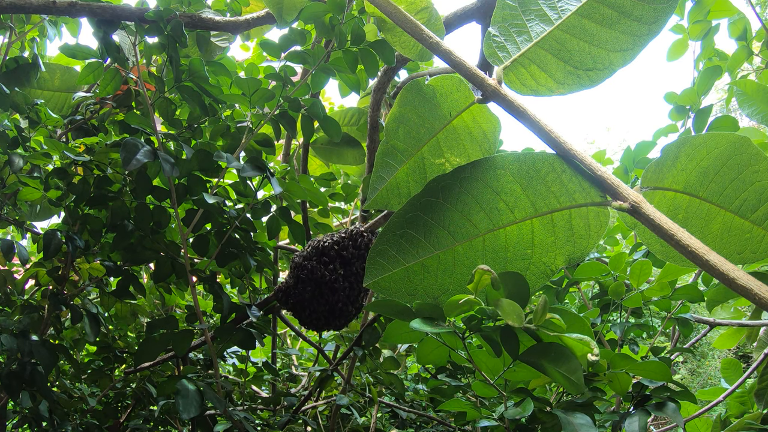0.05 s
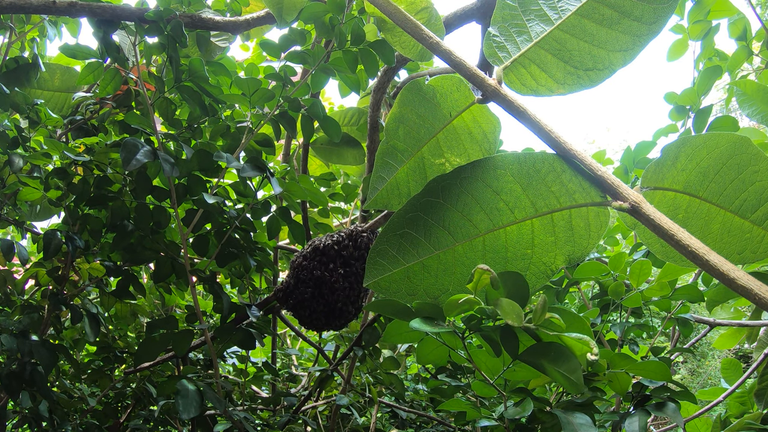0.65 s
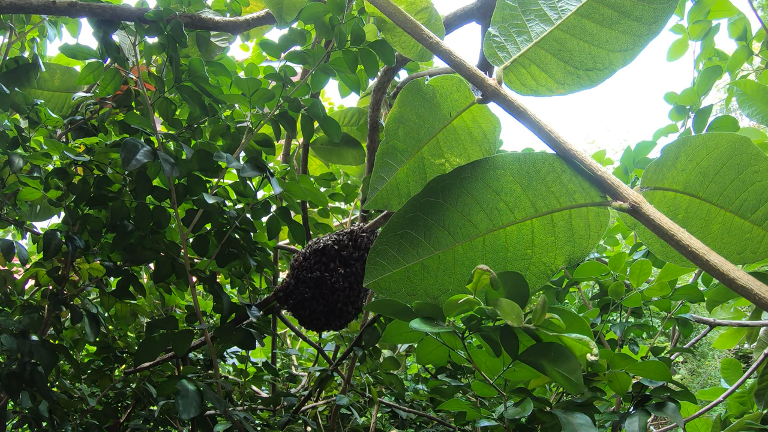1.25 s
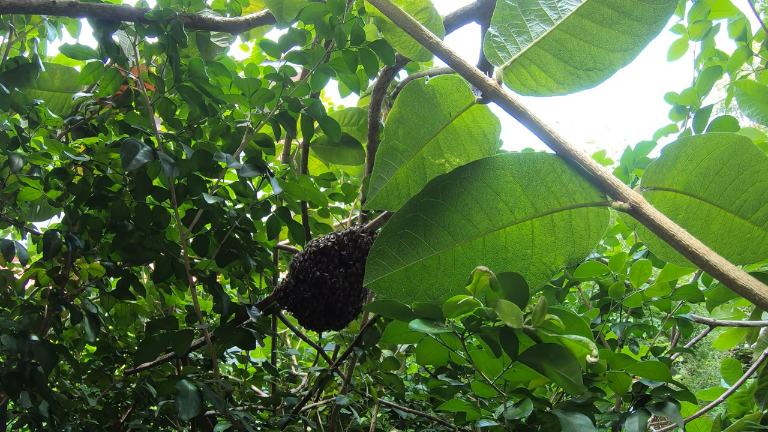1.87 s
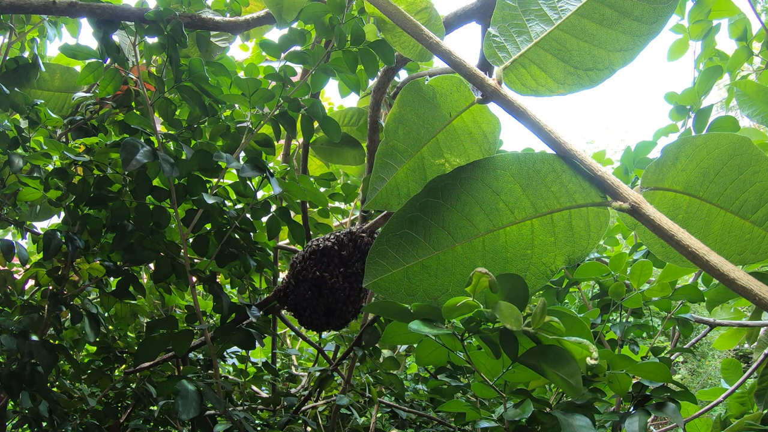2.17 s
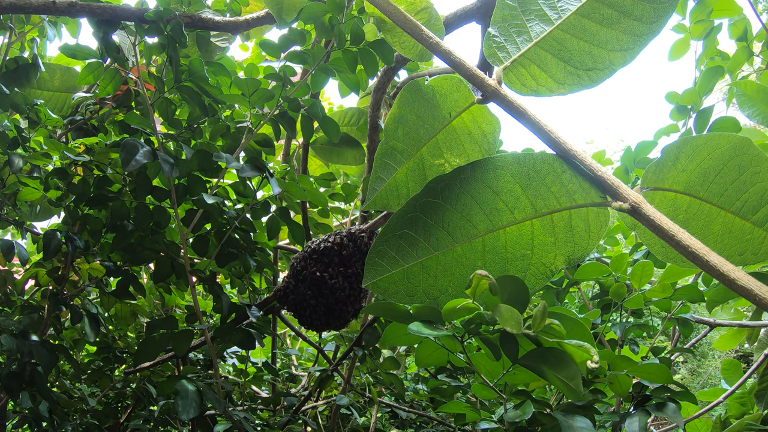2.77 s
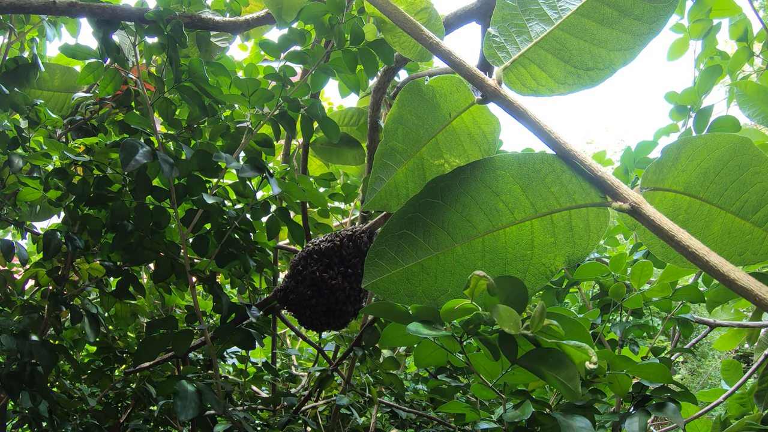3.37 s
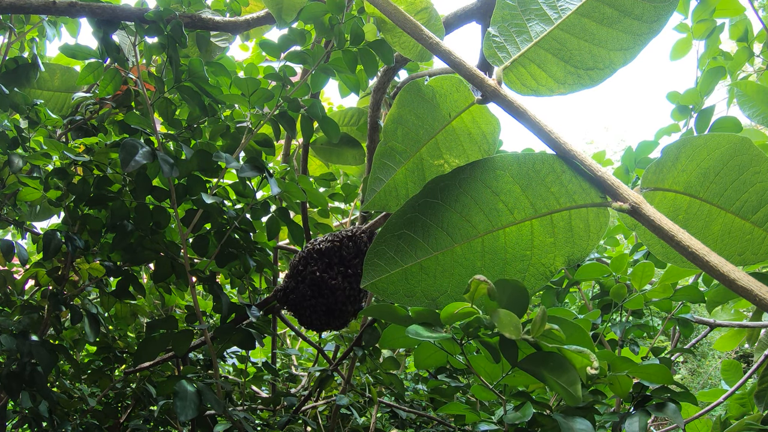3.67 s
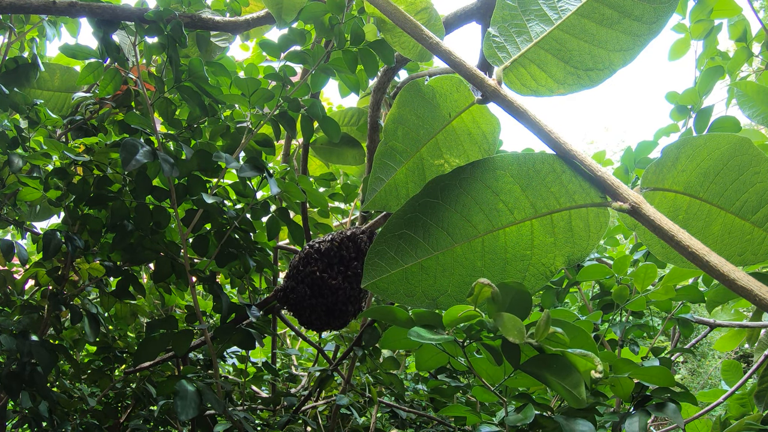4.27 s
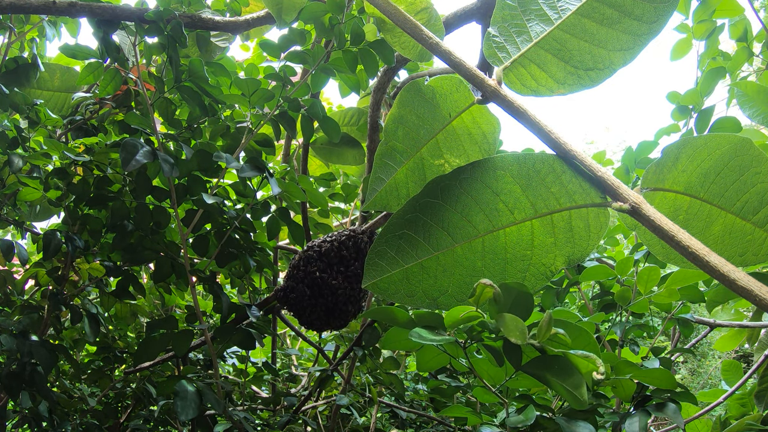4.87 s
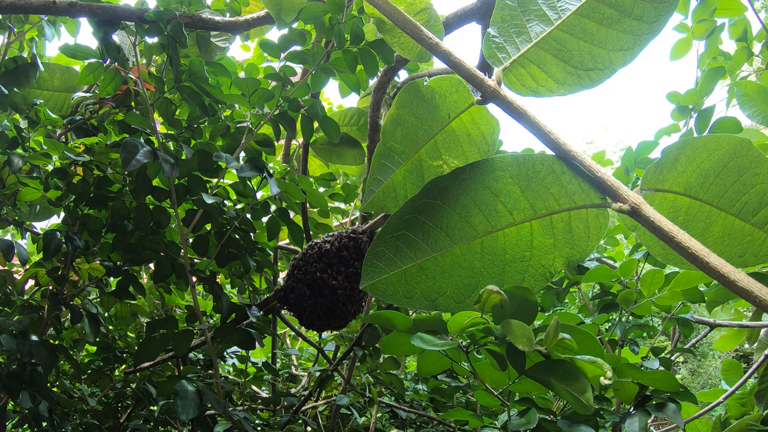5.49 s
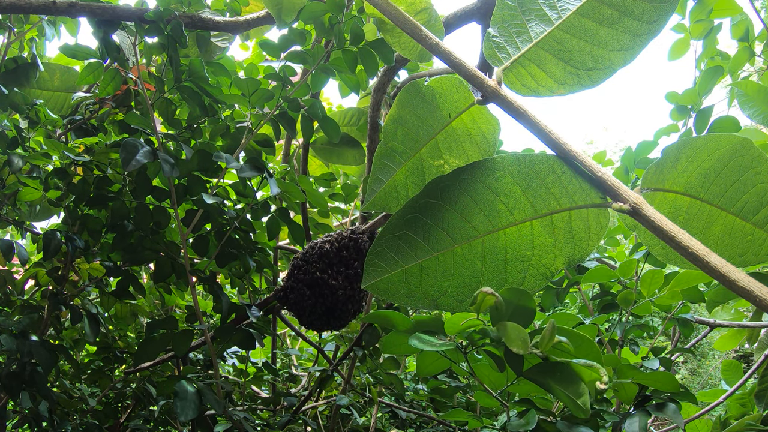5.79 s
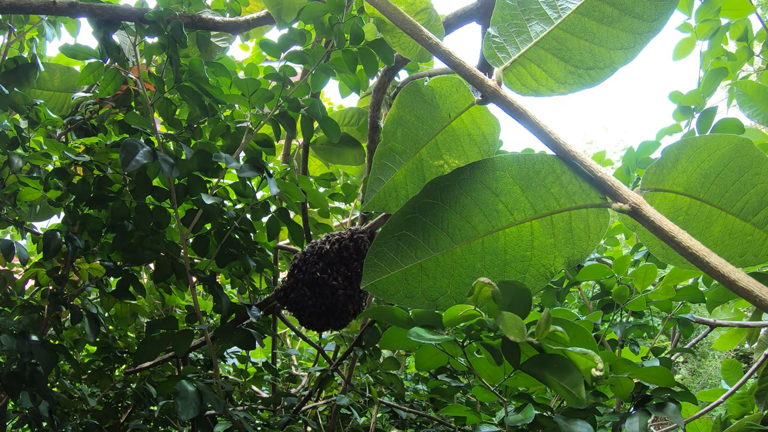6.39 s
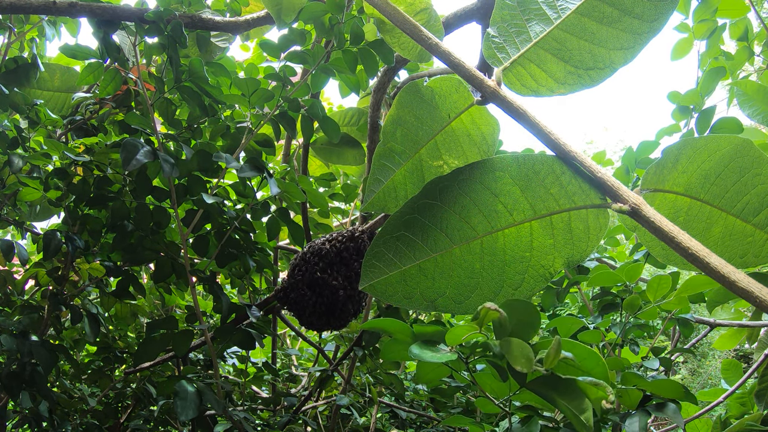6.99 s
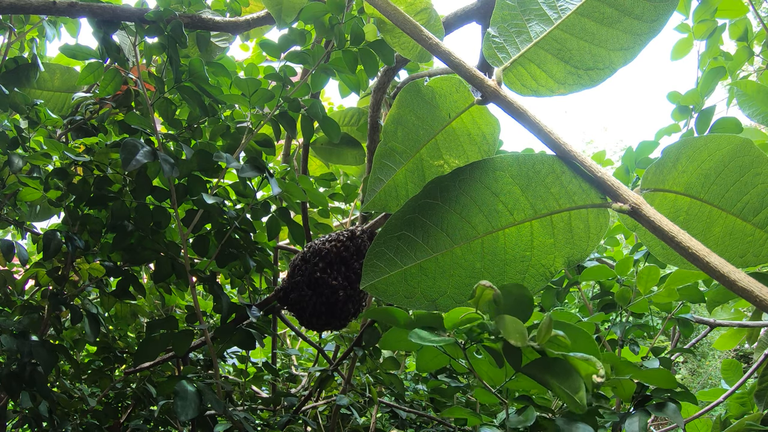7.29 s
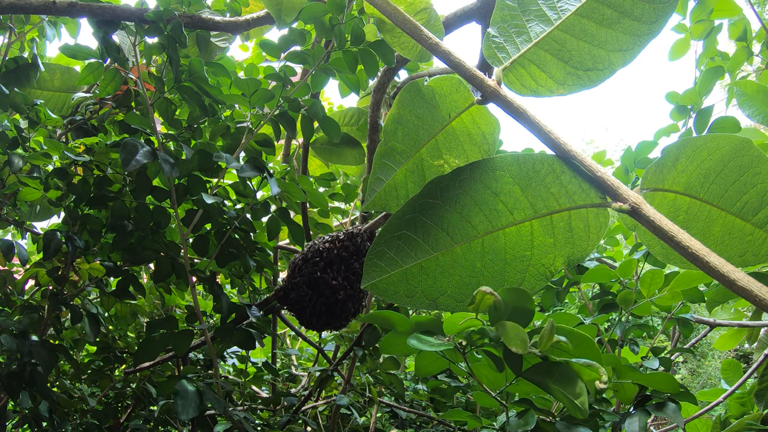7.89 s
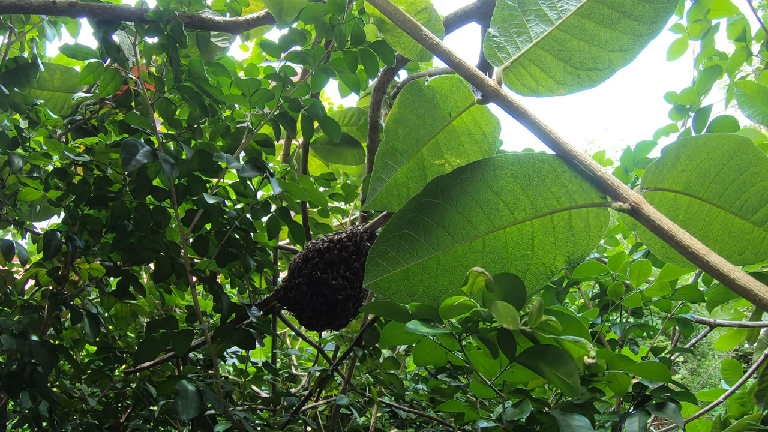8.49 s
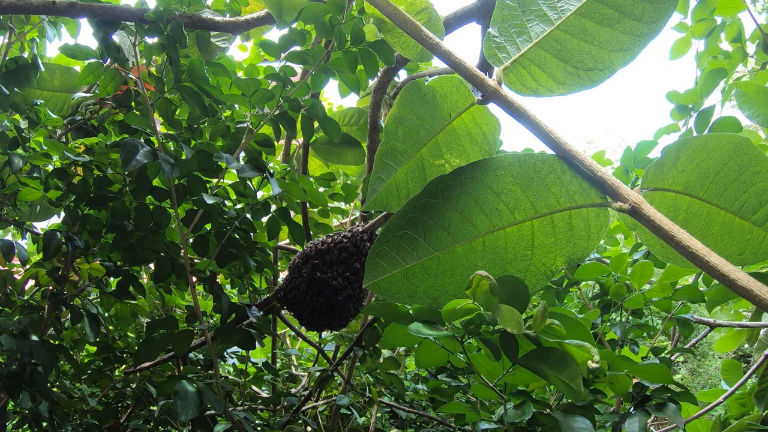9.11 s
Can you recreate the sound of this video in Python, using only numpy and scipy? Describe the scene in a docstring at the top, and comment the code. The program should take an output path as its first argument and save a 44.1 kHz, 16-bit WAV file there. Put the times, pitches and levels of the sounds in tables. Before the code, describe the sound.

Bursts of hissing swell and fade from a cluster of bees in foliage, above a soft hum and faint bird calls.

```python
"""Waves of hissing come from a bee colony hanging in dense foliage: bee after bee briefly whirs
its wings, and the alarm runs over the comb. Under it lie a low, uneven hum of wings and the
rumble of the air. Leaves rustle now and then, one bird chatters in short, raspy bursts, and
a far one gives a run of soft hoots."""
import sys
import numpy as np
from scipy import signal
from scipy.fft import rfft, irfft
from scipy.io import wavfile
from scipy.ndimage import uniform_filter1d

SR = 44100
rng = np.random.default_rng(int(sys.argv[2]) if len(sys.argv) > 2 else 0)


def transcribe(signal):
    """Save signal, clipped to [-1, 1], as a 16-bit WAV file at the path in sys.argv[1]."""
    frames = np.atleast_2d(signal).T
    limited = np.clip(frames, -1, 1)
    pcm = np.round(limited * 32767).astype(np.int16)
    wavfile.write(sys.argv[1], SR, pcm)


N = 407925
TIME = np.arange(N) / SR
FREQS = np.fft.rfftfreq(N, 1 / SR)


def gain_of(db):
    """Turns decibels into a number to multiply a sound by."""
    return 10 ** (np.asarray(db) / 20)


def evened(x):
    """Scales a signal to a typical size (rms) of 1."""
    return x / np.sqrt(np.mean(x ** 2) + 1e-20)


def curve(points):
    """Joins (Hz, value) points into a curve over all frequencies, on a log scale."""
    hz, value = np.transpose(points)
    return np.interp(np.log(FREQS + 1), np.log(hz + 1), value)


def drift(rate_hz):
    """A smooth random wobble; a higher rate makes it quicker."""
    return evened(irfft(rfft(rng.standard_normal(N)) * np.exp(-(FREQS / rate_hz) ** 2), N))


def patchy_noise(depth_db, size):
    """Two noises whose level wanders in patches; size is (frequency steps, time steps)."""
    frames = dict(nperseg=1024, noverlap=768)
    spectra = signal.stft(rng.standard_normal((2, N)), **frames)[2]
    patches = uniform_filter1d(rng.standard_normal(spectra.shape[1:]), size[0], axis=0)
    patches = evened(uniform_filter1d(patches, size[1], axis=1))
    return signal.istft(spectra * gain_of(depth_db * patches), **frames)[1][:, :N]


def swells(rows, steady_db):
    """Level in dB of a steady sound plus bell-shaped swells."""
    bells = sum(gain_of(db) ** 2 * np.exp(-((TIME - peak) / half) ** 2) for peak, half, db in rows)
    return 10 * np.log10(gain_of(steady_db) ** 2 + bells)


# Left-right balance. Each row: frequency in Hz, how much louder the left is in dB.
BALANCE = [(60, 0.0), (750, -1.5), (1200, 1.5), (4200, 0), (7000, -5), (9200, -3), (10700, 6), (12500, 5),
           (15700, 4)]
# How alike the two sides sound. Each row: frequency in Hz, likeness (1 the same, 0 unrelated).
LIKENESS = [(40, .88), (150, .97), (350, .84), (600, .35), (1100, .12), (2300, .42), (4100, .6),
            (5200, .03), (7200, -.1), (10000, 0)]
def stereo(noises, colour):
    """Gives two unrelated noises a tone colour and blends them into left and right."""
    left, other = rfft(noises)
    likeness, side_db = curve(LIKENESS), curve(BALANCE)
    right = likeness * left + np.sqrt(1 - likeness ** 2) * other
    sides = np.array([left * gain_of(side_db / 2), right * gain_of(-side_db / 2)])
    return evened(irfft(sides * gain_of(curve(colour)), N))


# Waves of alarm. Each row: start in seconds, crest in seconds, level in dB,
# half length in seconds, how fast the stragglers fade in dB per second.
ALARM_WAVES = [(-0.1, 0.063, -27, 0.23, 53), (0.099, 0.283, -28.5, 0.083, 116),
               (0.645, 0.739, -31, 0.032, 90), (0.554, 0.635, -45, 0.055, 57),
               (0.53, 0.833, -33.5, 0.079, 37), (1.523, 1.661, -33.5, 0.071, 22),
               (1.574, 1.815, -34.5, 0.16, 27), (2.035, 2.085, -41, 0.024, 90),
               (2.546, 2.717, -31, 0.084, 30), (2.971, 3.058, -54, 0.02, 76),
               (3.265, 3.333, -37.5, 0.037, 71), (3.177, 3.42, -39, 0.16, 29),
               (3.962, 4.052, -43, 0.038, 45), (4.456, 4.721, -26, 0.08, 81),
               (5.27, 5.499, -27.5, 0.077, 90), (5.842, 5.948, -35.5, 0.054, 90),
               (5.967, 6.058, -30, 0.084, 87), (6.453, 6.537, -41, 0.033, 90),
               (6.52, 6.698, -30, 0.069, 97), (6.998, 7.082, -38.5, 0.038, 88),
               (7.025, 7.242, -31, 0.085, 94), (7.546, 7.643, -43.5, 0.042, 49),
               (7.704, 7.86, -34.5, 0.096, 78), (8.088, 8.208, -54.5, 0.096, 58.5),
               (8.24, 8.454, -32.5, 0.068, 83), (8.759, 9.054, -32.5, 0.079, 51)]
def alarm(restless_db=-61, onset_s=0.047, stray_db=-5, gather_db_per_s=73):
    """Level in dB of the comb: a wave starts abruptly, most bees whir at its crest, a few trail off."""
    power = np.full(N, gain_of(restless_db) ** 2)
    for start, crest, db, half, fade in ALARM_WAVES:
        t = TIME - crest
        onset = np.clip((TIME - start) / onset_s, 0, 1)
        crowd = np.exp(-(t / half) ** 2)
        strays = gain_of(stray_db + np.minimum(gather_db_per_s * t, -fade * t)) ** 2
        power += (gain_of(db) * onset) ** 2 * (crowd + strays)
    return 10 * np.log10(power)


def wingbeats(beat_hz, spread, puff_beats, bees):
    """Each bee puffs air once per wingbeat, at its own wandering rate; together they sound grainy."""
    moments, power = np.linspace(0, TIME[-1], 60), np.zeros(N)
    for rates in beat_hz * np.exp(spread * rng.standard_normal((bees, len(moments)))):
        beats = np.cumsum(np.interp(TIME, moments, rates)) / SR
        power += np.exp(-(beats % 1) / puff_beats)
    return evened(np.sqrt(power))


# Tone colour of the hiss. Each row: frequency in Hz, relative level in dB.
HISS_COLOUR = [(250, -31), (700, -17.0), (1000, -12.5), (1300, -10.5), (2100, -4.0), (3100, -3.5),
               (4200, -4.5), (5200, -2), (6100, -3.0), (7500, -0.5), (9500, -4.5), (11400, -12),
               (12500, -13.5), (15700, -25)]
def colony_hiss(level_db=-0.92, body_hz=3000, fizz_hz=10000):
    """Wing puffs swell and fade as a wave crosses the comb, brightest and smoothest at the crest."""
    wave_db = alarm()
    below_crest_db = wave_db.max() - wave_db
    puffs = patchy_noise(depth_db=1.04, size=(10, 8))
    puffs *= wingbeats(beat_hz=212, spread=0.14, puff_beats=0.71, bees=14)
    hiss = stereo(puffs, HISS_COLOUR)
    low, no_fizz = (irfft(rfft(hiss) / (1 + (FREQS / hz) ** 8), N) for hz in (body_hz, fizz_hz))
    # as a wave dies, its highest fizz goes first and its body last
    fizz = (hiss - no_fizz) * gain_of(0.12 * (7.5 - below_crest_db))
    middle = no_fizz - low
    body = low * gain_of(-1.02 + 0.16 * below_crest_db)
    flutter_db = (0.58 + 0.012 * below_crest_db) * drift(rate_hz=21)
    lean_db = np.array([[-0.12], [0.12]])  # the comb is a little louder on the right
    return (body + middle + fizz) * gain_of(wave_db + level_db + flutter_db + lean_db)


def wing_tones(beat_hz, spread, waver, fade_db, bees):
    """A few tones, as of flying bees: each has its own pitch, and wavers and fades."""
    out = np.zeros(N)
    for offset in np.linspace(-1, 1, bees):
        hz = beat_hz * np.exp(spread * offset + waver * drift(rate_hz=9.09))
        out += np.sin(2 * np.pi * np.cumsum(hz) / SR) * gain_of(fade_db * drift(rate_hz=2.5))
    return evened(out)


# Tone colours of the calm hum, the swollen hum and the hum's upper part.
# Each row: frequency in Hz, relative level in dB.
CALM_COLOUR = [(60, -30), (110, -12.5), (165, -1.5), (210, -4), (255, -6), (310, -10), (500, -83)]
SWOLLEN_COLOUR = [(50, -34), (85, -9), (125, -0.5), (190, 0), (250, -9), (340, -19.5), (600, -48)]
UPPER_COLOUR = [(220, -32), (300, -2), (375, 0.5), (450, -4.5), (560, -10), (900, -13), (2000, -43)]
# Bees flying near. Each row: nearest moment in seconds, half length in seconds,
# level of the low hum in dB, level of its upper part in dB.
FLY_BYS = [(0.66, 0.062, -47, -70), (0.917, 0.2, -49, -53.5), (1.384, 0.16, -47.5, -69),
           (1.61, 0.15, -54, -53), (1.863, 0.19, -45.5, -54), (2.556, 0.19, -54, -59),
           (3.07, 0.22, -50.5, -53), (3.495, 0.12, -45.5, -53), (3.736, 0.13, -38.5, -57),
           (4.1, 0.22, -44.5, -54.5), (4.878, 0.4, -51.5, -58.5), (5.358, 0.076, -52.5, -63),
           (7.2, 0.36, -52, -68), (8.95, 0.062, -59, -56)]
def hum(steady_low_db=-52.5, steady_upper_db=-63, settle_db_per_s=-0.42, blur_db=-2):
    """Low and higher wing tones blur into a hum that slowly settles and deepens as bees fly near."""
    settle_db = settle_db_per_s * TIME
    low_db = swells([(peak, half, db) for peak, half, db, _ in FLY_BYS], steady_low_db + settle_db)
    upper_db = swells([(peak, half, db) for peak, half, _, db in FLY_BYS], steady_upper_db + settle_db)
    calm, swollen, upper = (stereo(patchy_noise(depth_db=1, size=(1, 30)), colour)
                            for colour in (CALM_COLOUR, SWOLLEN_COLOUR, UPPER_COLOUR))
    low_tones = wing_tones(beat_hz=210.7, spread=0.08, waver=0.05, fade_db=7, bees=3)
    upper_tones = wing_tones(beat_hz=372, spread=0.04, waver=0.04, fade_db=6, bees=3)
    calm = gain_of(blur_db) * calm + gain_of(-5) * low_tones
    upper = gain_of(blur_db) * upper + gain_of(-7) * upper_tones
    swell = np.clip((low_db + 50) / 7, 0, 1)  # calm up to -50 dB, fully swollen 7 dB higher
    low = np.sqrt(1 - swell) * calm + np.sqrt(swell) * swollen
    return gain_of(low_db) * low + gain_of(upper_db + 0.5) * upper


# Tone colours of the air's rumble and its far wash. Each row: frequency in Hz, relative level in dB.
GUST_COLOUR = [(15, -24), (30, -19), (48, -6.5), (64, -0.5), (82, -7), (130, -11.5), (300, -83)]
WASH_COLOUR = [(100, 7.5), (450, -0.5), (700, -2.5), (1500, -2), (3000, -12), (8000, -12), (15000, -57)]
# Gusts of air. Each row: peak in seconds, half length in seconds, level in dB.
AIR_GUSTS = [(.45, 0.1, -60.5), (1.3, 0.24, -59), (3.1, .22, -56), (3.76, 0.21, -49.5), (4.25, 0.1, -51.5),
             (4.7, .14, -53.5), (5.8, 0.42, -53.5), (6.52, 0.19, -52.5), (7.45, 0.26, -56),
             (8.68, 0.13, -52.5)]
def air(calm_db=-65.5, lumps_db=2, wash_db=-57):
    """Moving air makes deep, lumpy gusts and a thin, steady wash from far away."""
    rumble = stereo(rng.standard_normal((2, N)), GUST_COLOUR)
    rumble *= gain_of(swells(AIR_GUSTS, calm_db) + lumps_db * drift(rate_hz=8))
    wash = stereo(patchy_noise(depth_db=3, size=(8, 12)), WASH_COLOUR)
    return rumble + gain_of(wash_db) * wash


# Tones that swell out of the hum.
# Each row: peak in seconds, half length in seconds, pitch in Hz, level in dB.
DRONE_NOTES = [(3.118, 0.19, 378, -49.5), (3.59, 0.099, 554, -59), (5.313, 0.083, 222.7, -54),
               (6.104, 0.59, 63.8, -55.5), (7.3, 0.48, 215, -54), (1.41, 0.34, 207.8, -48.5),
               (1.598, .12, 383.6, -56), (4.91, 0.083, 211.7, -52)]
def drones():
    """Pairs of close, wavering tones come forward and sink back."""
    out = np.zeros(N)
    for peak, half, hz, db in DRONE_NOTES:
        bell = np.exp(-((TIME - peak) / half) ** 2)
        out += gain_of(db) * bell * wing_tones(hz, spread=0.035, waver=0.03533, fade_db=-2, bees=2)
    return out


# Short, grainy noises: leaf rustles, ticks and the rasp of the bird's chirps. Each row: peak in
# seconds, level in dB, centre pitch in Hz, width in octaves, rise in seconds, decay in seconds.
GRAINY_NOISES = [(1.176, -46, 2090, 0.84, 0.0043, 0.035), (1.222, -47.5, 3200, 0.75, 0.0087, 0.02),
                 (1.38, -54, 3000, .55, .006, .028), (2.21, -51, 1800, .35, .003, .014),
                 (2.304, -48, 2100, .7, .002, .007), (2.532, -49, 3200, 1.0, .002, 0.0094),
                 (2.91, -45, 1900, .5, .003, .04), (2.962, -45, 3300, 0.6, 0.008, 0.012),
                 (3.05, -45.5, 2600, 0.84, 0.02, .015), (5.06, -54, 2600, 0.76, .03, 0.027),
                 (5.118, -51.5, 1850, 0.35, 0.011, 0.033), (5.808, -54, 2400, .35, .012, .025),
                 (7.985, -43.5, 1380, 1, 0.023, 0.039), (8.438, -42.5, 950, 1.0, 0.033, 0.041),
                 (8.468, -46, 470, 0.6, 0.04, 0.018), (8.812, -51, 1400, 1.0, 0.011, 0.03),
                 (8.865, -51, 1800, 0.73, .015, .03), (8.98, -50, 800, 1.0, 0.072, .05)]
def rustles_and_rasps(grain_db=3):
    """Leaf rustles, ticks and the rasp of chirps: each is a short, grainy noise around one pitch."""
    out, t = np.zeros((2, N)), np.arange(-SR // 8, SR // 4) / SR
    octaves = np.log2(np.fft.rfftfreq(len(t), 1 / SR) + 1)
    for peak, db, hz, width, rise, decay in GRAINY_NOISES:
        noise = rng.standard_normal((4, len(t)))
        sides, shared, roughness = noise[:2], noise[2], noise[3]
        grains = gain_of(grain_db * evened(uniform_filter1d(roughness, size=90)))
        band = np.exp(-0.5 * ((octaves - np.log2(hz)) / width) ** 2)
        burst = evened(irfft(rfft((sides + shared) * grains) * band, len(t)))
        shape = np.exp(-np.where(t < 0, (t / rise) ** 2, t / decay))
        slot = out[:, round((peak + t[0]) * SR):][:, :len(t)]
        slot += (gain_of(db) * shape * burst)[:, :slot.shape[1]]
    return out


def foliage(sound, tail_s, echo_db):
    """Leaves and trunks scatter a short echo, different on each side, that falls 60 dB in tail_s."""
    t = np.arange(SR // 2) / SR
    tail = evened(rng.standard_normal((2, len(t))) * gain_of(-60 * t / tail_s)) / np.sqrt(len(t))
    return sound + gain_of(echo_db) * signal.fftconvolve(sound[None], tail, axes=1)[:, :N]


def add_bird_note(out, start, pitch_hz, wobble, db):
    """Adds one whistled note that swells and fades while its pitch wobbles."""
    span = slice(round(start * SR), round(start * SR) + len(pitch_hz))
    arch = 1 - np.linspace(-1, 1, len(pitch_hz)) ** 2
    tone = np.sin(2 * np.pi * np.cumsum(pitch_hz * wobble[span]) / SR)
    out[span] += gain_of(db) * evened(tone * arch)


# One bird's quick chatter. Each row: start in seconds, length in seconds,
# first pitch in Hz, last pitch in Hz, relative level in dB.
CHATTER_NOTES = [(1.212, .011, 1740, 2250, -40.5), (1.225, 0.013, 1940, 1700, -51),
                 (1.372, 0.023, 3300, 3510, -57), (2.901, .016, 3100, 2450, -50),
                 (2.906, .012, 1950, 1520, -46.5), (2.931, .009, 1300, 2150, -48),
                 (2.934, .013, 1200, 1050, -47), (2.945, 0.018, 2300, 3400, -49.5),
                 (2.956, .013, 994, 794, -46), (3.746, .022, 1900, 1940, -52.5),
                 (3.767, 0.023, 2700, 3300, -53), (5.802, 0.028, 3160, 3190, -50.5)]
def bird_chatter(level_db=-1.5, rasp=0.063):
    """Very short, slightly raspy slides in pitch, scattered by the leaves."""
    out, wobble = np.zeros(N), 1 + rasp * drift(rate_hz=600)
    for start, length, first_hz, last_hz, db in CHATTER_NOTES:
        pitch_hz = np.linspace(first_hz, last_hz, round(length * SR))
        add_bird_note(out, start, pitch_hz, wobble, db + level_db)
    return foliage(out, tail_s=0.19, echo_db=-2.5)


# A far bird's hoots. Each row: start in seconds, length in seconds, top pitch in Hz, relative level in dB.
HOOT_NOTES = [(3.89, .1, 1210, -63), (4.06, 0.05, 1250, -48), (4.16, 0.044, 1186, -56),
              (4.245, 0.042, 1175, -53.5), (4.345, 0.059, 1170, -56), (4.47, 0.08, 1197, -53),
              (4.82, 0.12, 1200, -59), (5.01, 0.135, 1200, -54), (5.22, 0.133, 1200, -54),
              (5.43, 0.164, 1205, -53), (5.645, 0.13, 1200, -56), (5.86, .09, 1205, -57),
              (6.32, 0.11, 1235, -57.5)]
def bird_hoots(level_db=-9, bend=0.055, waver=0.011, flutter_db=2.5):
    """Far, soft notes, each rising and falling a little, wavering and fluttering through the leaves."""
    out, wobble = np.zeros(N), 1 + waver * drift(rate_hz=66)
    for start, length, top_hz, db in HOOT_NOTES:
        pitch_hz = top_hz * (1 - bend * np.linspace(-1, 1, round(length * SR)) ** 2)
        add_bird_note(out, start, pitch_hz, wobble, db + level_db)
    out *= gain_of(flutter_db * drift(rate_hz=30))
    return foliage(out, tail_s=0.39, echo_db=-2) * gain_of([[2], [-2]])  # louder on the left


def scene():
    """The colony in front, everything else around it."""
    return colony_hiss() + hum() + air() + drones() + rustles_and_rasps() + bird_chatter() + bird_hoots()


def record(dry):
    """Cuts away the very highest treble, above 15850 Hz."""
    low_pass = signal.firwin(511, 15850, window=("kaiser", 9), fs=SR)
    return signal.oaconvolve(dry, low_pass[None], "same")


dry = scene()
out = record(dry)
transcribe(out)
```